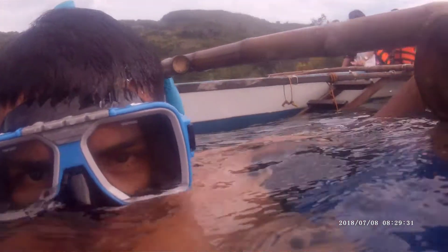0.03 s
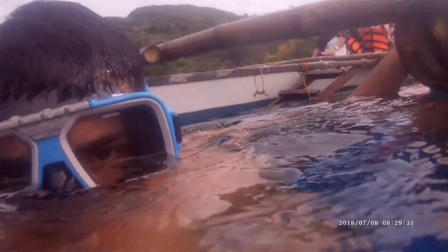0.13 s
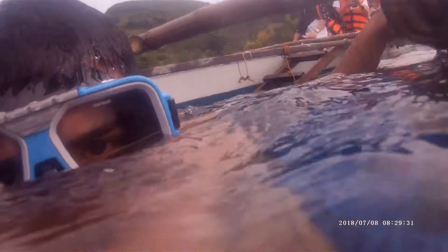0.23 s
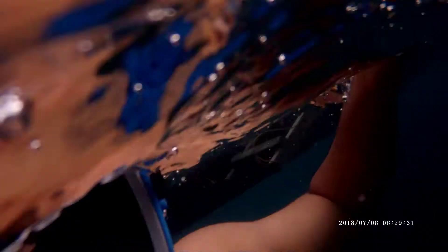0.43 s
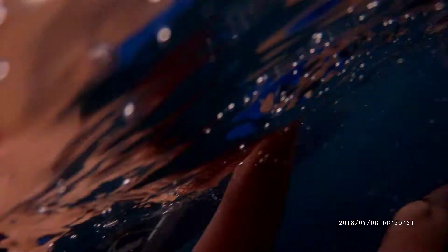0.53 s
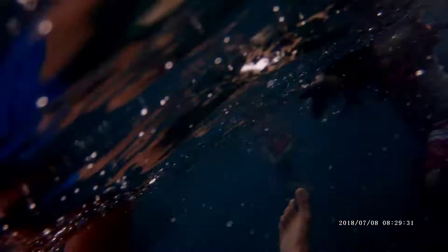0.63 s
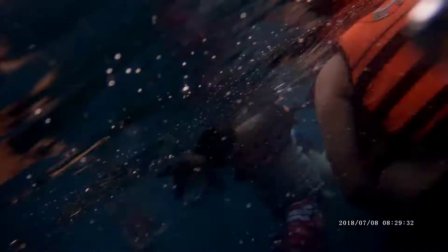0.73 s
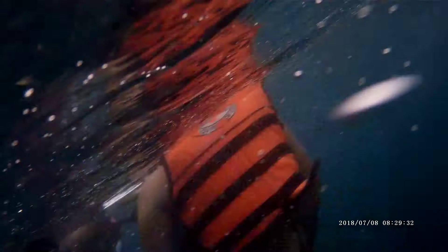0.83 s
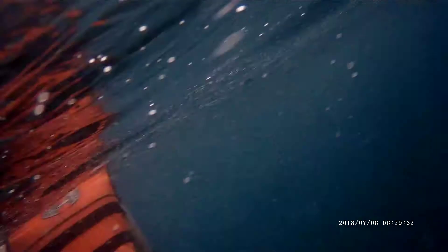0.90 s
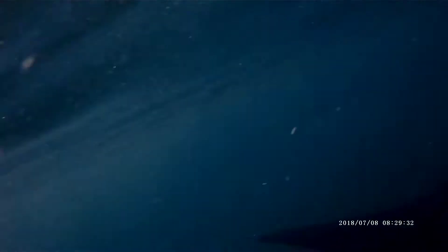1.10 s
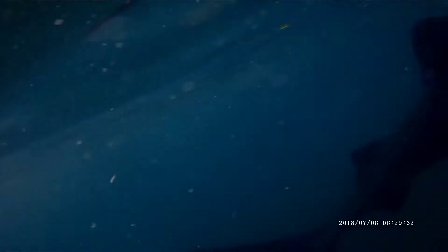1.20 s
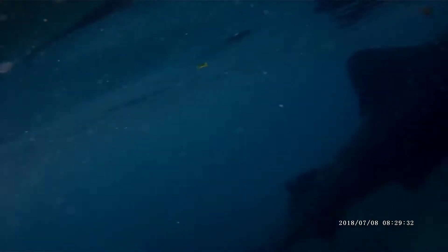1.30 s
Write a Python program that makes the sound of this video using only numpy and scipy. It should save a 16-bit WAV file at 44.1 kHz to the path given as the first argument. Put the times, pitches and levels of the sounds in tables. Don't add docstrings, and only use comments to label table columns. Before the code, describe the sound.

A camera in a plastic shell dips underwater: one hard slap, then wet knocks and bubble ticks

```python
import sys
import numpy as np
from scipy import signal
from scipy.fft import rfft, irfft, next_fast_len
from scipy.io import wavfile
from scipy.ndimage import map_coordinates

SR = 44100
rng = np.random.default_rng(int(sys.argv[2]) if len(sys.argv) > 2 else 0)


def boost_factor(decibels):
    exponent = np.asarray(decibels, float) / 20
    return 10 ** exponent


def store_wav(level_fs):
    pcm = np.round(np.clip(np.atleast_2d(level_fs), -1, 1) * 32767)
    wavfile.write(sys.argv[1], SR, pcm.T.astype(np.int16))


N = 59535

KNOCK_RISE_S, TICK_RISE_S = 0.00059, 0.00047
SHELL_STIFF_HZ = 850


def unit(x):
    return x / np.sqrt(np.mean(x ** 2) + 1e-20)


def since(start_s):
    return np.maximum(np.arange(N) / SR - start_s, 0)


def curve(rows):
    return np.interp(since(0), *np.transpose(rows))


def wobble(rate_hz):
    return map_coordinates(rng.standard_normal(1000), [since(0) * rate_hz])


def noise(spectrum):
    size = next_fast_len(N + 8192)
    freq_hz, density_db = np.transpose(spectrum)
    bins_hz = np.fft.rfftfreq(size, 1 / SR)
    gain = boost_factor(np.interp(np.log(bins_hz + 1), np.log(freq_hz + 1), density_db))
    return unit(irfft(rfft(rng.standard_normal(size)) * gain, size)[:N])


def fade(t, rise_s, t60_s):
    return (1 - np.exp(-(t / rise_s) ** 2)) * boost_factor(-60 * t / np.maximum(t60_s, .002))


def no_bass(x, order, stiff_hz):
    return signal.sosfilt(signal.butter(order, stiff_hz, "high", fs=SR, output="sos"), x)


def taps(rows, modes, rise_s, rough, stiff_hz=SHELL_STIFF_HZ):
    scatter_db, rough_s = 2, 0.0012
    out, t = np.zeros(N + SR), np.arange(SR // 10) / SR
    mode_hz, mode_db, mode_t60_s = np.transpose(modes)[:, :, None]
    chance = rng.standard_normal((len(rows), 2, len(modes), 1))
    knots = rng.standard_normal((len(rows), 2, len(t) // 10))
    for (start_s, peak_db, own_hz, t60_s), (size, phase), pair in zip(rows, chance, knots):
        mode_gain = fade(t, rise_s, mode_t60_s) * boost_factor(mode_db + scatter_db * size)
        ring = mode_gain * np.sin(2 * np.pi * mode_hz * t + 2 * phase)
        sway = 1 + rough * map_coordinates(pair[0] + 1j * pair[1], [t / rough_s])
        own = fade(t, rise_s, t60_s) * np.imag(sway * np.exp(2j * np.pi * own_hz * t))
        tap = own / np.abs(own).max() + ring.sum(0)
        out[round(start_s * SR):][:len(t)] += boost_factor(peak_db) * tap
    return no_bass(out[:N], 4, stiff_hz)


def slap():
    start_s, rise_s, hold_s, fall_s = 0.2172, 0.0009, 0.0054, 0.0011
    start_hz, end_hz, sag_s = 1620, 1327, 0.0024
    level_db, tail_db, tail_t60_s, stiff_hz = 2, 9.5, 0.021, 120
    t = since(start_s)
    pitch_hz = end_hz + (start_hz - end_hz) * np.exp(-(t / sag_s) ** 2)
    driven = 1 / (1 + np.exp(np.minimum((t - hold_s) / fall_s * 2, 50)))
    tail = boost_factor(np.minimum(tail_db - 60 * t / tail_t60_s, 0))
    size = fade(t, rise_s, 3.3) * (driven + (1 - driven) * tail)
    phase = 2 * np.pi * np.cumsum(pitch_hz * (t > 0)) / SR
    return no_bass(boost_factor(level_db) * size * np.sin(phase), 2, stiff_hz)


def knocks():
    # start_s, peak_db, pitch_hz, t60_s
    surface_rows = [(0.098, -49, 1467, 0.038), (0.1205, -21, 1563, 0.017), (0.1915, -47, 1544, 0.014),
                    (0.199, -33, 1615, 0.011), (0.2283, -27, 1391, 0.03), (0.2425, -28, 1620, 0.017),
                    (0.251, -32.5, 1620, 0.042), (0.262, -29, 1578, 0.019), (0.2766, -14.5, 1717, 0.018),
                    (0.282, -18.5, 1707, 0.014), (0.2885, -19.5, 1437, 0.022), (0.292, -21.5, 1550, 0.023),
                    (0.3175, -34, 1590, 0.045), (0.3216, -12.5, 1574, 0.008), (0.326, -24, 1630, 0.048),
                    (0.332, -31, 1580, 0.1), (0.348, -39.5, 1460, 0.03), (0.352, -34.5, 1633, 0.02),
                    (0.37, -30.5, 1300, 0.02), (0.3805, -31.5, 1475, 0.023), (0.3885, -29.5, 2130, 0.012),
                    (0.4257, -28.5, 1350, 0.018), (0.442, -32.5, 1076, 0.015), (0.448, -23.5, 1326, 0.013)]
    sunk_rows = [(0.452, -26, 1780, 0.019), (0.457, -17.5, 1890, 0.0093), (0.461, -30.5, 1604, 0.02),
                 (0.465, -29, 1750, 0.054), (0.481, -31.5, 1750, 0.029), (0.4897, -14.5, 1750, 0.03),
                 (0.4915, -12, 1740, 0.013), (0.507, -21, 1860, 0.0049), (0.511, -33, 2060, 0.017),
                 (0.543, -48.5, 2143, 0.026), (0.623, -21.5, 1840, 0.01), (0.6253, -16.5, 1750, 0.017),
                 (0.654, -26, 1858, 0.029), (0.6606, -12.5, 1980, 0.0043), (0.6611, -6, 1665, 0.0087),
                 (0.6642, -19.5, 1750, 0.018), (0.667, -27, 1847, 0.03), (0.769, -36.5, 1640, 0.019),
                 (0.7735, -29, 1760, 0.0083), (0.7791, -7, 1564, 0.0082), (0.7815, -25, 1603, 0.014),
                 (0.799, -42, 1704, 0.012), (0.826, -43, 1470, 0.026), (0.866, -43, 1400, 0.037),
                 (0.907, -37.5, 2234, 0.03), (0.9806, -28, 1697, 0.034), (0.9855, -30, 1712, 0.024),
                 (1.018, -39, 1680, 0.03), (1.038, -45, 1730, 0.022), (1.168, -34, 1550, 0.0081),
                 (1.328, -48, 1450, 0.054)]
    # start_s, peak_db, pitch_hz, t60_s
    thud_rows = [
        (.2174, -20, 708, 0.012),
        (.623, -44, 510, 0.0073),
        (1.169, -42, 595, 0.0048),
    ]
    # pitch_hz, level_db, t60_s
    shell_modes = [(1011, -17.5, 0.026), (1400, -17.5, 0.032), (1750, 0, 0.012)]
    rough, dry_stiff_hz, thud_stiff_hz = 0.45, 1150, 252
    above = taps(surface_rows, shell_modes[1:], KNOCK_RISE_S, rough, dry_stiff_hz)
    below = taps(sunk_rows, shell_modes, KNOCK_RISE_S, rough)
    thuds = taps(thud_rows, shell_modes[:1], KNOCK_RISE_S, 0, thud_stiff_hz)
    return above + below + thuds


def ticks():
    # start_s, peak_db, pitch_hz
    surface_rows = [(0.1205, -35.5, 3850), (0.124, -43, 3400), (0.185, -52, 3470), (0.191, -57, 4040),
                    (0.229, -53.5, 5380), (0.242, -36, 4270), (0.246, -30, 3220), (0.252, -38.5, 3610),
                    (0.256, -41, 3020), (0.262, -30.5, 3430), (0.2766, -16.5, 2950), (0.28, -36.5, 3470),
                    (0.29, -24, 3630), (0.317, -27, 3630), (0.3207, -15, 2540), (0.331, -15.5, 3720),
                    (0.349, -40, 3450), (0.352, -26.5, 3990), (0.37, -19.5, 2560), (0.3808, -29.5, 5030),
                    (0.3884, -24, 4200), (0.391, -30.5, 3250)]
    sunk_rows = [(0.449, -29.5, 4300), (0.457, -21, 4140), (0.459, -26.5, 3070), (0.4566, -30, 5460),
                 (0.465, -59, 4420), (0.473, -69, 3200), (0.481, -61.5, 4220), (0.4891, -10, 3036),
                 (0.4888, -22.5, 4176), (0.504, -43, 4000), (0.507, -49, 3800), (0.618, -47, 3030),
                 (0.625, -20.5, 2965), (0.622, -30, 4040), (0.642, -54, 4400), (0.649, -51.5, 4300),
                 (0.6534, -30, 4400), (0.661, -28.5, 3820), (0.771, -37, 4030), (0.7791, -16.5, 2537),
                 (0.78, -20.5, 3070), (0.784, -28, 2530), (0.7995, -44, 3320), (0.8174, -45, 3770),
                 (0.8255, -34, 3910), (0.9096, -45, 2590), (0.9816, -35, 3170), (0.9827, -26.5, 4070),
                 (0.9893, -35.5, 3910), (1.17, -47, 3130)]
    # pitch_hz, level_db, t60_s
    rim_modes = [(2358, -12.5, 0.018), (3070, -6.5, 0.015), (4300, -21.5, 0.017), (5470, -25.5, 0.0052)]
    t60_s, rough = 0.007, 0.6
    rows = [(*row, t60_s) for row in surface_rows + sunk_rows]
    return taps(rows, rim_modes, TICK_RISE_S, rough)


def spits():
    # start_s, band_7khz_db, band_10khz_db
    spit_rows = [(0.1222, -50, -54.5), (0.2192, -60, -60), (0.2413, -36.5, -61), (0.251, -34, -42),
                 (0.261, -43, -67), (0.281, -37, -39.5), (0.293, -57, -61), (0.318, -28.5, -45),
                 (0.332, -24.5, -53.5), (0.3516, -29.5, -64.5), (0.37, -28, -28), (0.3805, -52, -64),
                 (0.389, -45, -66), (0.4583, -35, -61), (0.457, -38, -50.5), (0.486, -38, -43),
                 (0.4885, -46.5, -70), (0.504, -47.5, -47), (0.625, -63, -76), (0.631, -56, -69.5),
                 (0.6547, -58, -54.5), (0.6598, -48, -70), (0.664, -60, -63), (0.772, -51.5, -69),
                 (0.782, -46, -53), (0.8269, -41.5, -68), (0.981, -42, -53), (0.983, -24, -46),
                 (0.99, -37, -61)]
    # freq_hz, density_db [dB per Hz]
    bands = [
        [(4500, -17.5), (5800, 7.5), (7500, -2.5), (9500, -34)],
        [(7500, -26), (9400, 2.5), (10800, -5), (12500, -42)],
    ]
    t60_s = 0.0034
    size = np.zeros((2, N))
    for start_s, *band_db in spit_rows:
        size += boost_factor(band_db)[:, None] * fade(since(start_s), TICK_RISE_S, t60_s)
    return sum(gain * noise(band) for gain, band in zip(size, bands))


def rub():
    # time_s, level_db
    pressure = [
        (1.16, -68),
        (1.168, -49),
        (1.185, -53.5),
        (1.212, -43.5),
        (1.237, -41),
        (1.246, -67),
    ]
    # freq_hz, density_db [dB per Hz]
    friction = [(110, -50), (426, -23), (828, -12), (1680, 1.5), (2610, -24), (3000, -13.5), (4430, -22),
                (5560, -34.5), (7230, -45), (11200, -54), (12200, -90)]
    lump_db = 3
    t = since(0)
    touching = (t > pressure[0][0]) * (t < pressure[-1][0])
    return touching * boost_factor(curve(pressure) + lump_db * wobble(100)) * noise(friction)


def bubbles():
    # start_s, peak_db, pitch_hz, t60_s
    air = [
        (0.142, -63, 1000, 0.21),
        (0.364, -55, 327, 0.12),
        (0.596, -50, 1030, .06),
        (.662, -34.5, 678, 0.046),
        (0.682, -55, 975, .15),
        (.78, -44.5, 657, 0.076),
    ]
    rise_s, climb_per_s = 0.0022, 3.3
    start_s, peak_db, pitch_hz, t60_s = np.transpose(air)[:, :, None]
    t = since(start_s)
    note = np.sin(2 * np.pi * pitch_hz * (t + climb_per_s * t * t / 2))
    return np.sum(boost_factor(peak_db) * fade(t, rise_s, t60_s) * note, 0)


def wash():
    # time_s, level_db
    flow = [(0, -54), (.03, -64.5), (.17, -61), (.2, -55), (.41, -54.5), (.47, -53.5), (.53, -58.5),
            (.975, -58.5), (.995, -50.5), (1.012, -51.5), (1.02, -47.5), (1.034, -51), (1.045, -55),
            (1.155, -53), (1.25, -57), (1.35, -57.5)]
    # freq_hz, density_db [dB per Hz]
    water = [(600, -43.5), (1400, 2.5), (1800, -3), (2600, -21), (3100, -13.5), (4400, -21), (5400, -32.5),
             (16000, -70)]
    dull = [(20, -39.5), (90, -20), (300, -1), (1200, 3.5), (2200, -55)]
    lump_db, fine_lump_db = 0, 3.5
    rumble_level_db, follow, sway_db = -67.5, 0.17, 1.5
    flow_db = curve(flow)
    lumps = unit(boost_factor(lump_db * wobble(34.76) + fine_lump_db * wobble(190)))
    rumble_db = rumble_level_db + follow * (flow_db - flow_db.mean()) + sway_db * wobble(25)
    return boost_factor(flow_db) * lumps * noise(water) + boost_factor(rumble_db) * noise(dull)


def fizz():
    # freq_hz, density_db [dB per Hz]
    hiss = [(2300, -30.5), (3000, 1), (4500, -3.5), (5200, -15.5), (7800, -24.5), (11000, -29),
            (12000, -43.5), (15500, -44.5), (16300, -79)]
    start_s, rise_s, t60_s = 0.99, 0.0033, 0.34
    level_db, floor_db = -63, -78.5
    cloud = boost_factor(level_db) * fade(since(start_s), rise_s, t60_s)
    return (cloud + boost_factor(floor_db)) * noise(hiss)


def scene():
    mix = slap() + knocks() + ticks() + spits() + rub() + bubbles() + wash() + fizz()
    return mix[None]


def roll_off(x):
    return signal.sosfilt(signal.butter(12, 16300, fs=SR, output="sos"), x)


def record(dry):
    top, hardness = 1.1, 6
    saturated = dry / (1 + np.abs(dry / top) ** hardness) ** (1 / hardness)
    return roll_off(np.clip(saturated, -1, 1))


dry = scene()
out = record(dry)
store_wav(out)
```